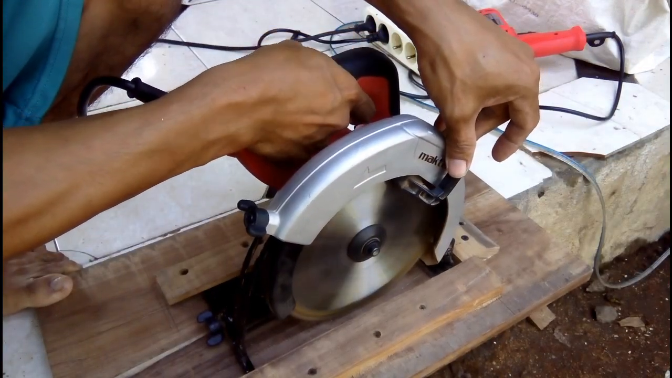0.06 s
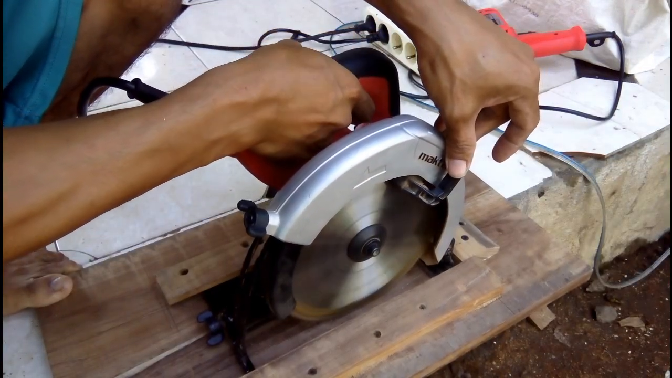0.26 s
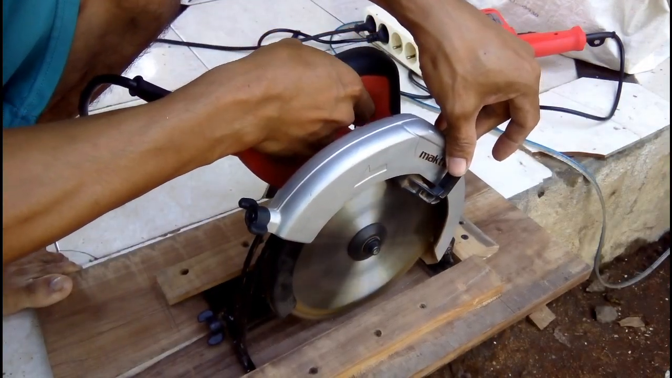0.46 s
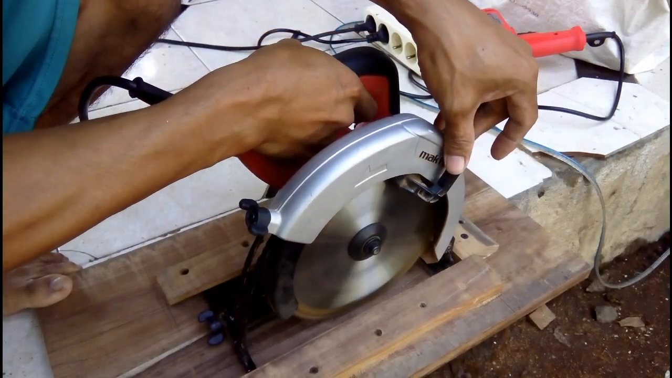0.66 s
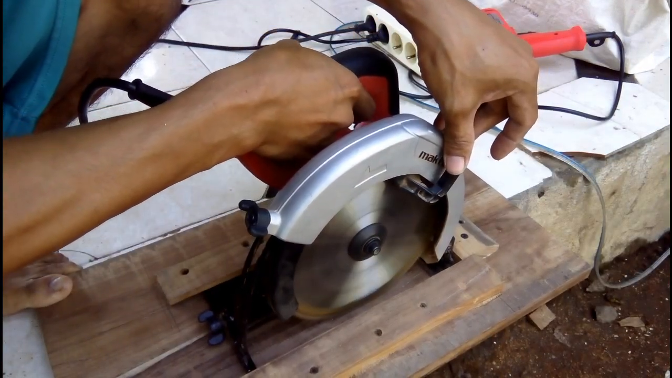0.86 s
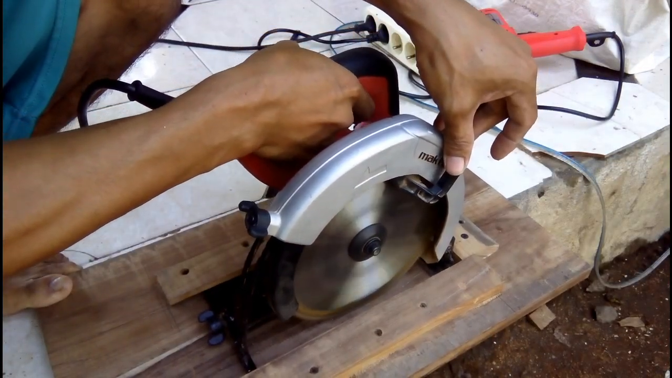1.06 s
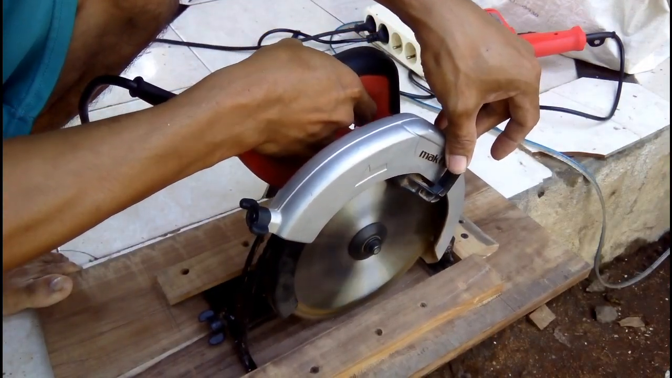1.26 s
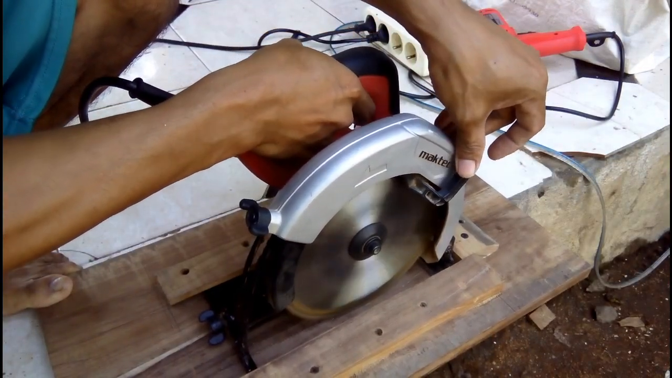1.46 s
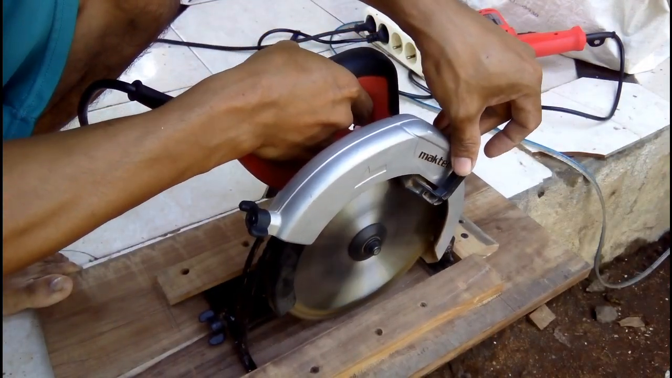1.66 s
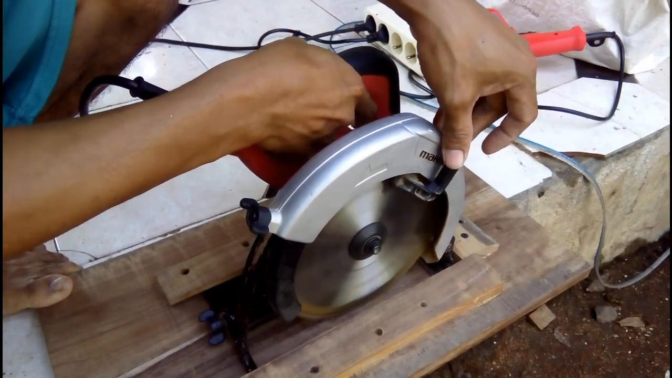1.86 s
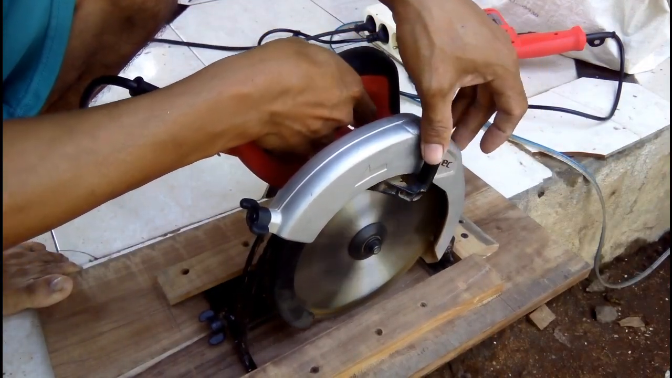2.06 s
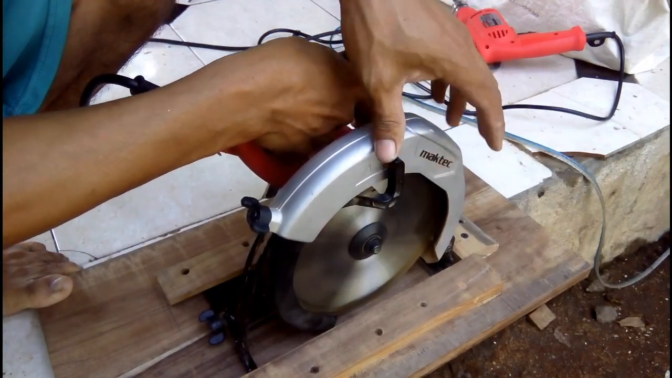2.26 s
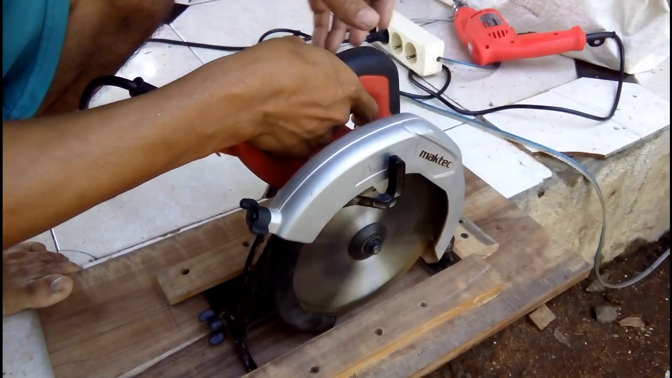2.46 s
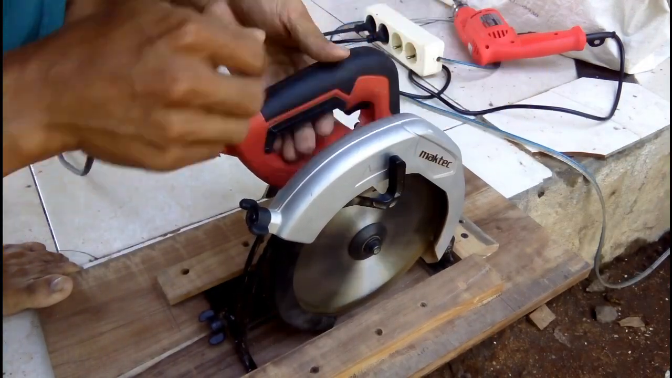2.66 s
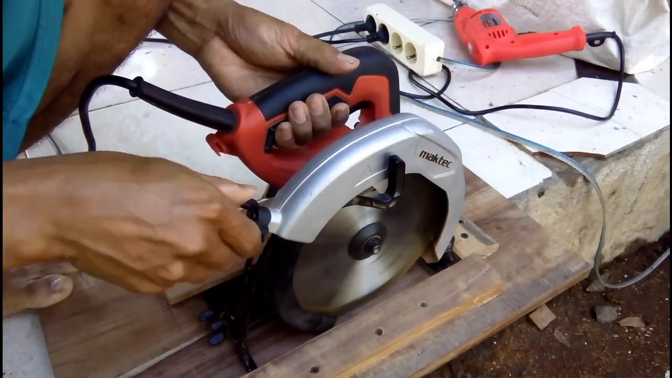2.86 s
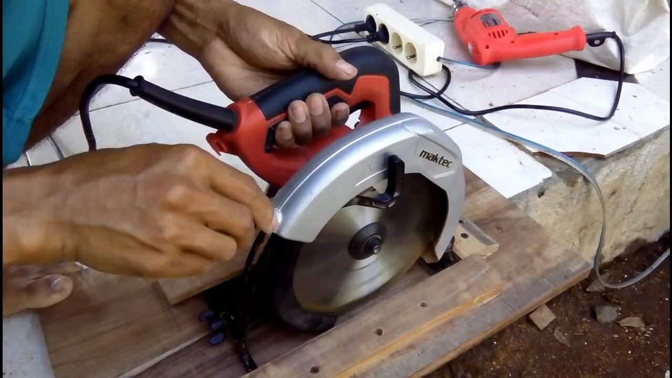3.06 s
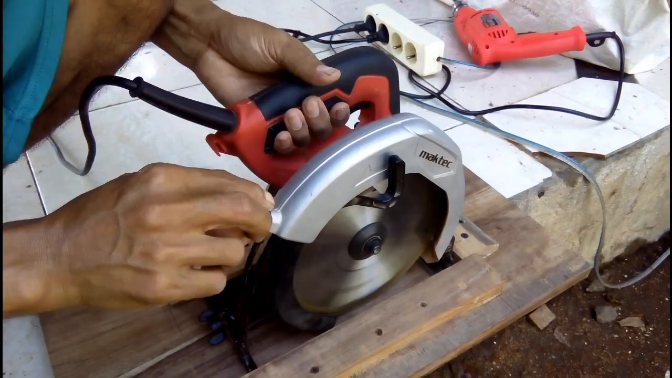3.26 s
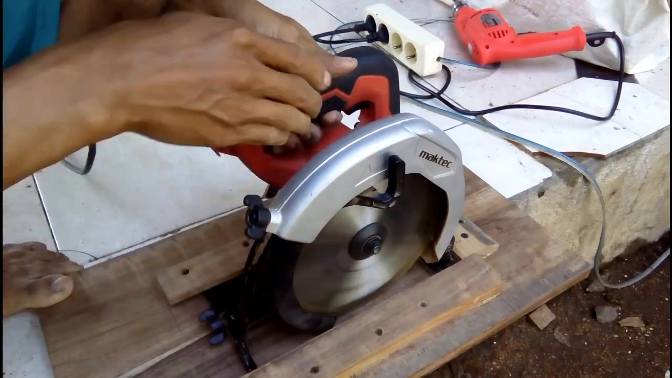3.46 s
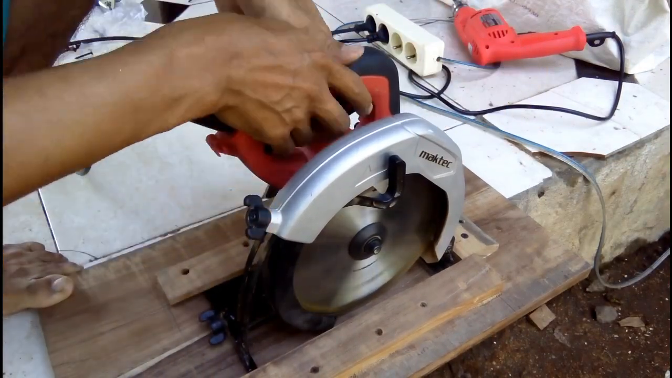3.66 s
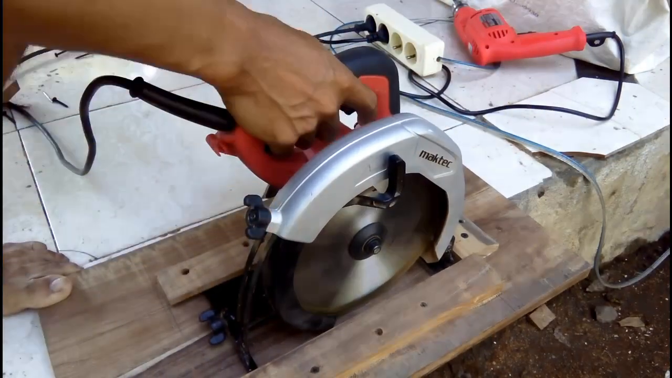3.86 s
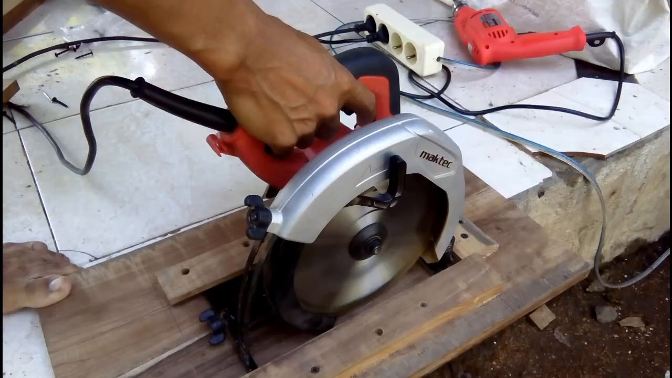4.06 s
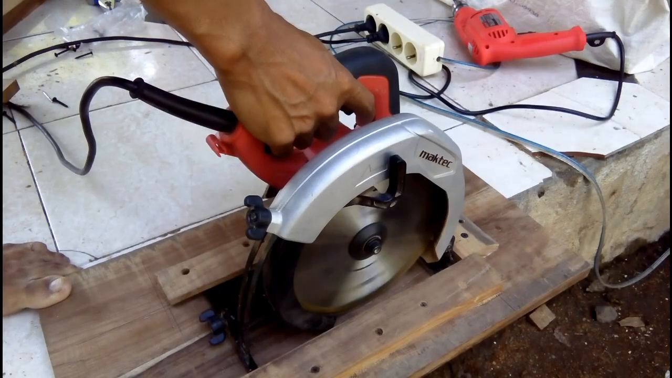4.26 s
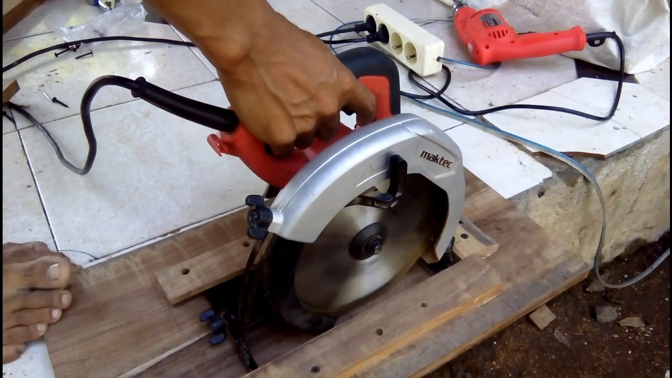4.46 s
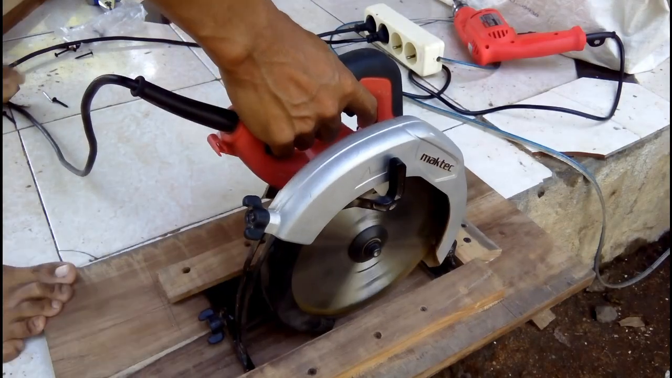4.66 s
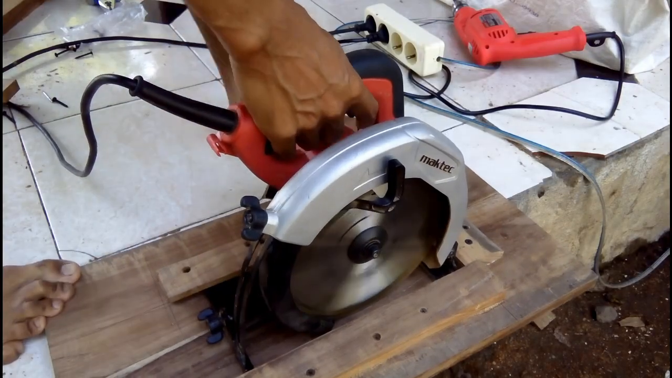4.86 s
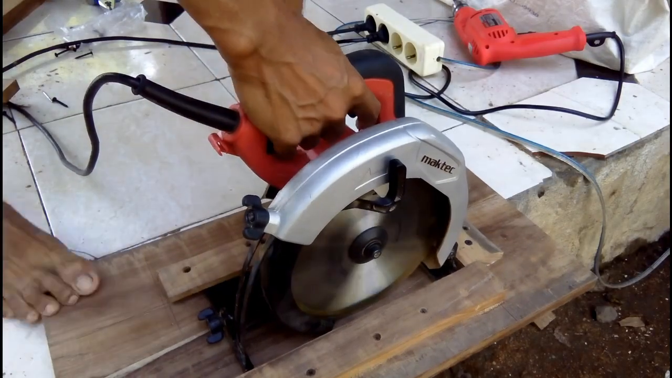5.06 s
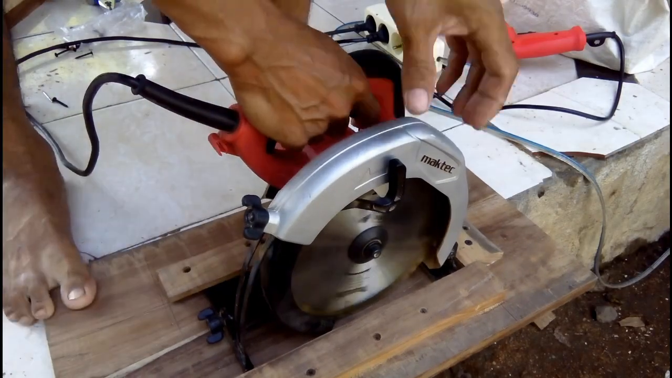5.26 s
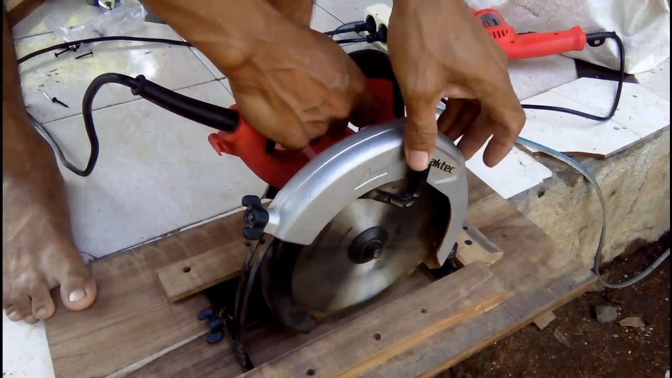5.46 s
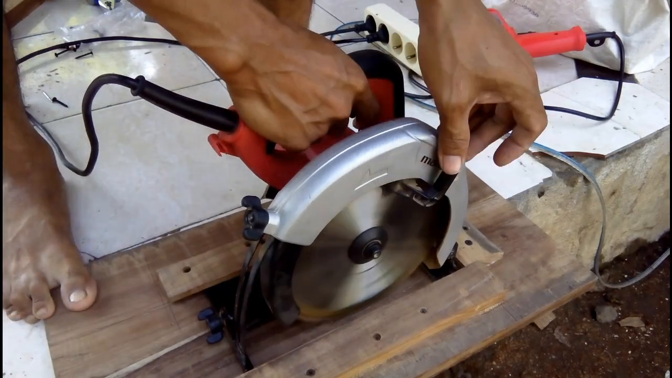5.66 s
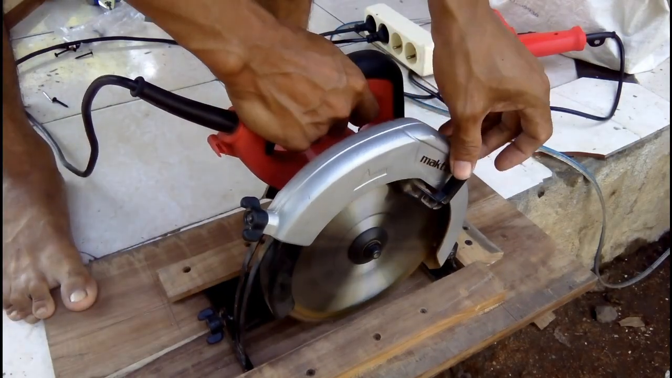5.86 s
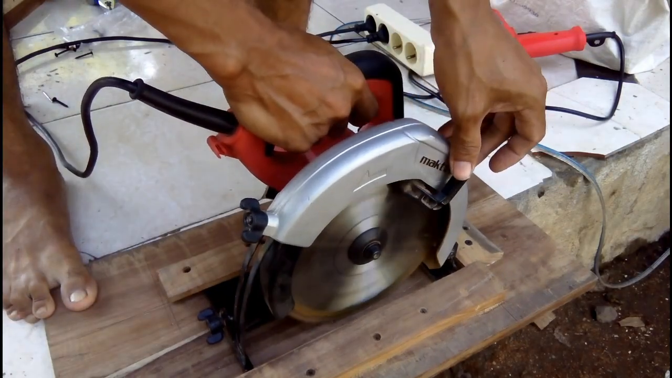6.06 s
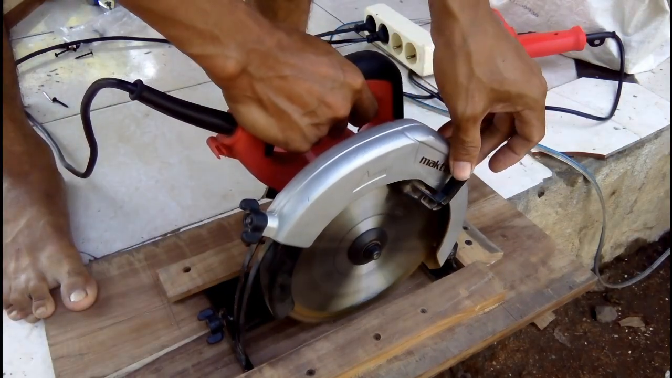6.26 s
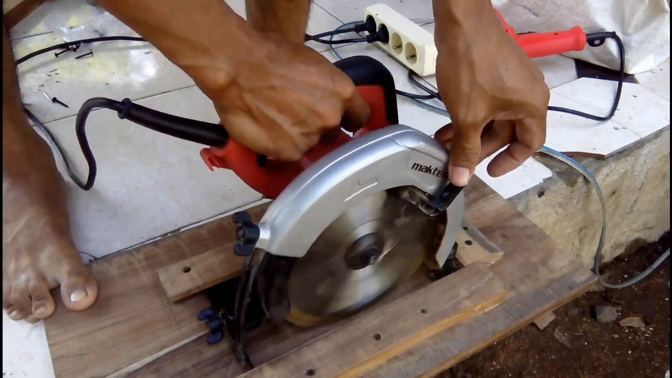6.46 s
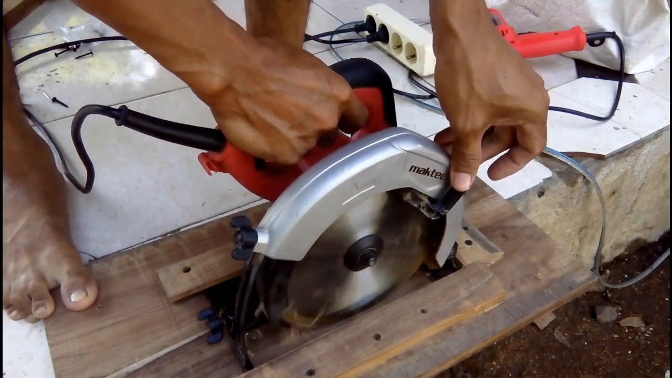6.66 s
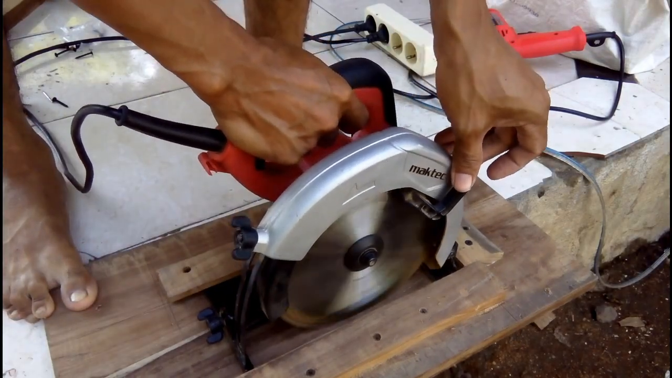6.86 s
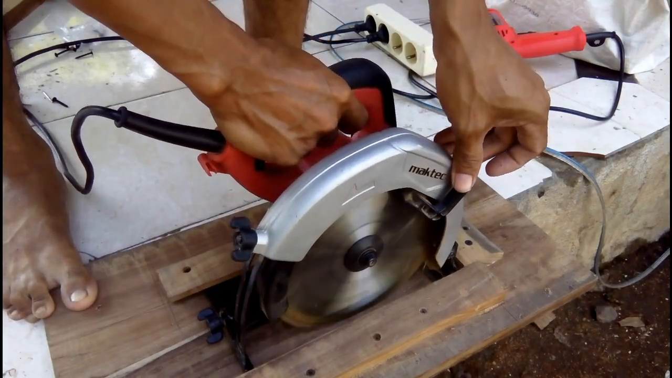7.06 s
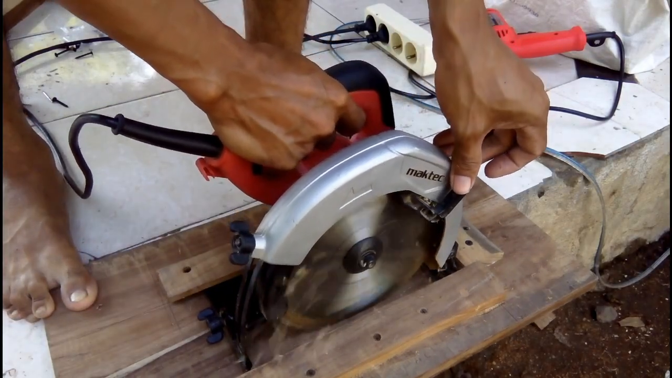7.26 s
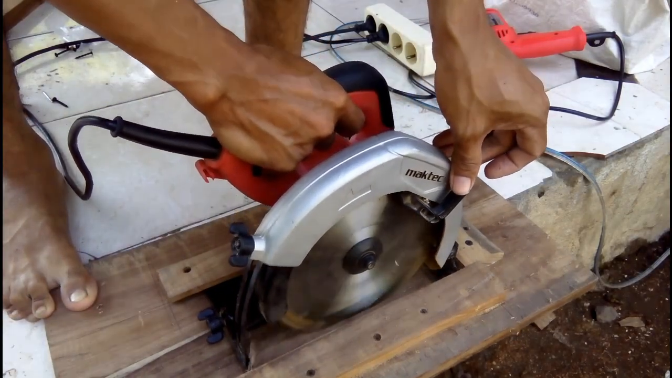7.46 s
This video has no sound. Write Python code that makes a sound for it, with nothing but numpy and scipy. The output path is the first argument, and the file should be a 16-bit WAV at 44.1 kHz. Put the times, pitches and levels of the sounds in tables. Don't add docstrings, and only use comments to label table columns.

```python
import sys
import numpy as np
from scipy import signal
from scipy.fft import rfft, irfft, next_fast_len
from scipy.io import wavfile
from scipy.ndimage import uniform_filter1d, map_coordinates

SR = 44100
rng = np.random.default_rng(int(sys.argv[2]) if len(sys.argv) > 2 else 0)


def undo_db(level):
    steps = np.asarray(level, float) / 20
    return 10 ** steps


def inscribe(sig):
    pcm = np.round(np.clip(np.atleast_2d(sig).T, -1, 1) * 32767)
    wavfile.write(sys.argv[1], SR, pcm.astype(np.int16))


N = 331632
TIME = np.arange(N) / SR
MAINS = 2 * np.pi * 100 * TIME
FAST_TURNS = 440


def unit(x):
    return x / np.sqrt(np.mean(x ** 2) + 1e-20)


def along(points, hz):
    f, v = np.transpose(points)
    return np.interp(np.log(hz + 1), np.log(f + 1), v)


def curves(rows):
    s, *cols = np.transpose(rows)
    return [np.interp(TIME, s, c) for c in cols]


def wobble(rate):
    coarse = np.arange(0, N + 16, 16)
    knots = rng.standard_normal(int(N * rate / SR) + 4)
    return np.interp(np.arange(N), coarse, map_coordinates(knots, [coarse * rate / SR]))


def filtered(x, response):
    m = next_fast_len(N + SR // 4)
    return irfft(rfft(x, m) * response(np.fft.rfftfreq(m, 1 / SR)), m)[..., :N]


def body(spectrum, modes):
    def response(f):
        peaks = sum(undo_db(2 * db) / (1 + (2 * (f - hz) / w) ** 2) for hz, w, db in modes)
        return undo_db(along(spectrum, f)) * np.sqrt(1 + peaks)
    return response


def resonant(modes):
    def response(f):
        return sum((-1) ** k * undo_db(db) * 1j * f * w / (c * c - f * f + 1j * f * w)
                   for k, (c, w, db) in enumerate(modes))
    return response


def patchy(depth_db, span):
    z = signal.stft(rng.standard_normal((2, N)), nperseg=span)[2]
    field = rng.standard_normal(z.shape[1:])
    field = uniform_filter1d(field, size=5, axis=0)
    field = uniform_filter1d(field, size=6144 // span, axis=1)
    return unit(signal.istft(z * undo_db(depth_db * unit(field)), nperseg=span)[1][:, :N])


# t/s, f/Hz (turns a second)
SHAFT = [(0, 410), (.62, 438), (.93, 372), (1.5, 435), (1.56, 425), (2.1, 328), (2.6, 276), (3.2, 215),
         (5.0, 66.5), (5.6, 13), (5.71, 6), (5.87, 140), (6.04, 126), (6.65, 440), (6.9, 466), (7.52, 468)]


def shaft_speed():
    return curves(SHAFT)[0]


def octaves_from_fast():
    return np.log2(shaft_speed() / FAST_TURNS)


# pulled t/s, released t/s, switch travel t/s
TRIGGER = [
    (-1, .63, .06),
    (.95, 1.53, .06),
    (5.718, 5.875, .012),
    (6.047, 9, .008),
]


def trigger():
    return sum(np.clip(np.minimum(TIME - on, off - TIME) / travel + .5, 0, 1) for on, off, travel in TRIGGER)


def motor_current():
    return trigger() * np.clip(1 - shaft_speed() / 480, 0, 1)


# t/s, level/dB, freedom of the blade to ring level/dB
HANDS = [(0, 1, -11), (.6, -0.5, -11), (.95, 2, -10.5), (1.3, 1, -8), (1.75, -0.5, -11.5), (1.88, 2, -9),
         (2.1, 1, -18), (2.7, 1, -19.5), (3.5, -0.5, -13.5), (4.5, 0, -6), (5.4, 2, -5), (5.78, 1.5, 4),
         (5.98, 5.5, -2.5), (6.25, 6.5, -3), (6.6, -0.5, -2), (6.7, 1, 1), (6.93, -2, 1), (7.52, -0.5, 3)]


def hands():
    return curves(HANDS)


def guard_bared():
    guard_s, swing_s = 6.656, 0.04
    return np.clip((TIME - guard_s) / swing_s + .5, 0, 1)


def ringing(shake, spectrum, modes):
    return unit(filtered(shake * patchy(depth_db=1.13, span=2 ** 9), body(spectrum, modes)))


# f/Hz, level/dB per Hz
FAN = [(35, -59), (60, -21), (135, -12.5), (275, -25), (422, -2), (476, -11.5), (701, -6.5), (1070, -13),
       (1680, -3.5), (2520, -2.5), (3780, -4), (6030, -0.5), (7700, -12.5), (10000, -41), (16900, -120)]
# f/Hz, width f/Hz, level/dB
GUARD = [(706, 80, 4), (1185, 90, 5), (1655, 30, 5), (2060, 120, 5), (2280, 250, 5), (2700, 60, 3),
         (3240, 120, 0), (3790, 320, 7), (4970, 120, 3), (5690, 60, 1), (6580, 120, 1)]


def fan_air(shake):
    level_db = -14 + 16.5 * octaves_from_fast() - 7 * guard_bared()
    return undo_db(level_db) * ringing(shake, FAN, GUARD)


def gear_level():
    coasting_db, per_octave_db, loaded_db = -20.5, 5, -5.5
    return undo_db(coasting_db + per_octave_db * octaves_from_fast() + loaded_db * trigger())


# f/Hz, level/dB per Hz
GEARS = [(180, -22), (300, -2.5), (399, -7), (901, -9.5), (1170, -6.5), (1880, -6), (2820, -9.5),
         (3270, -1), (3960, -15), (6280, -0.5), (7700, -24.5), (10000, -95), (16900, -120)]
# f/Hz, width f/Hz, level/dB
HOUSING = [(740, 114, 10.4), (1171, 24, 14.5), (1907, 780, 12.6), (3304, 12, 10.5), (3365, 66, 12.7),
           (4390, 150, 10.7), (5400, 46, 6.7), (6340, 520, 3.8)]


def gear_rattle(shake):
    level = gear_level() + undo_db(-27.5) * motor_current() + jolts()
    return level * ringing(shake, GEARS, HOUSING)


# f/Hz, level/dB per Hz
DRIVEN = [(35, -68), (60, -51), (492, -7), (603, -29), (696, -3.5), (945, -3), (1260, 1.5), (1480, -11),
          (1610, -4.5), (2570, -4.5), (3280, 2), (4110, -4), (7900, -7.5), (10300, -19.5), (17400, -120)]
# f/Hz, width f/Hz, level/dB
BLADE = [(715, 60, 6), (1170, 70, 9), (1300, 60, 12), (1630, 35, 11), (1760, 20, 10), (2170, 150, 3),
         (2700, 50, 4), (3280, 130, 12), (3860, 70, 3), (4440, 90, 5), (5665, 40, 9), (6570, 150, 7),
         (7604, 80, 8)]


def blade_ring(shake):
    _, free_db = hands()
    drive = undo_db(-14.5 + 9 * octaves_from_fast()) + undo_db(-35.5) * motor_current()
    return undo_db(free_db) * drive * ringing(shake, DRIVEN, BLADE)


# f/Hz, level/dB per Hz
FIZZ = [(4470, -12), (7600, 0.5), (8050, -10), (9640, -7.5), (13600, -19), (14600, -16.5), (15200, -28)]


def tips_and_arcs():
    tips = undo_db(-29.5 + 14.5 * octaves_from_fast() + 8.5 * guard_bared())
    arcs = undo_db(-22.5) * motor_current() * (shaft_speed() / FAST_TURNS) ** 2.4
    sparks = patchy(depth_db=4.5, span=2 ** 11) * undo_db(.9 * wobble(40) + .7 * wobble(9))
    return (tips + arcs) * unit(filtered(sparks, body(FIZZ, [])))


def saw():
    shaft_hz, power = shaft_speed(), trigger()
    shake = undo_db(0.99 * wobble(260) + 0.69 * wobble(30) + 0.37 * power * np.cos(MAINS))
    sound = fan_air(shake) + gear_rattle(shake) + blade_ring(shake)
    sound = sound + gear_level() * undo_db(-7.5 - 1.3 * octaves_from_fast()) * whine(shaft_hz, power)
    dull = filtered(sound, lambda f: 1 / (1 + (f / 3800) ** 4))
    slow = (1 - power) * np.clip(1 - shaft_hz / 70, 0, .9)
    sound = sound + slow * (dull - sound)
    level_db, _ = hands()
    return undo_db(level_db) * (sound + tips_and_arcs()) + stall(shaft_hz, power)


# start t/s, end t/s, multiple of shaft speed, level/dB
CROSSINGS = [(0, 0.268, 1, -28), (0.326, 0.66, 1, -25), (1, 1.495, 1, -36), (1.849, 2.109, 1, -31),
             (2.551, 2.9, 7, -31), (2.9, 3.121, 23.6, -25), (4.073, 4.3, 14, -37), (4.6, 4.8, 21, -36),
             (4.738, 4.864, 14, -34), (5.07, 5.155, 21, -34), (5.402, 5.471, 42, -42)]
# start t/s, end t/s, start f/Hz, end f/Hz, level/dB
SONGS = [(0.134, 0.246, 1680, 1666, -25), (0.354, 0.513, 1652, 1664, -13), (1.079, 1.297, 1650, 1655, -15),
         (1.8, 1.91, 1165, 1170, -21), (1.816, 1.93, 1632, 1620, -26), (2.398, 2.46, 1666, 1630, -21),
         (2.399, 2.85, 5410, 5380, -31.5), (2.794, 3.05, 3400, 3360, -27), (3.347, 3.903, 5420, 5340, -34),
         (3.744, 3.965, 3300, 3280, -27), (6.18, 6.42, 1143, 1167, -16.5), (6.275, 6.73, 1719, 1768, -17),
         (6.29, 6.66, 1622, 1635, -19.5), (6.335, 6.6, 2690, 2740, -20), (6.648, 6.904, 1257, 1304, -17),
         (6.855, 7.055, 1653, 1610, -18), (7.153, 7.267, 1650, 1617, -14.5),
         (7.145, 7.324, 1300, 1308, -11), (6.75, 7.523, 5700, 5610, -19.5)]


def songs():
    out, flutter, drift = np.zeros(N), undo_db(2.8 * wobble(45)), 0.84 * wobble(50)
    shaft_hz = shaft_speed()

    def span(s0, s1):
        return slice(round(s0 * SR), round(s1 * SR))

    notes = [(span(s0, s1), k * shaft_hz[span(s0, s1)], db) for s0, s1, k, db in CROSSINGS]
    for s0, s1, hz, end_hz, db in SONGS:
        when = span(s0, s1)
        notes.append((when, np.linspace(hz, end_hz, len(out[when])), db))
    for when, hz, db in notes:
        swell = np.sqrt(np.abs(np.sin(np.linspace(0, np.pi, len(hz)))))
        phase = 2 * np.pi * np.cumsum(hz) / SR + drift[when]
        out[when] += undo_db(db - 3.5) * swell * np.sin(phase)
    return out * flutter


# t/s, firings f/Hz, exhaust level/dB
BIKE = [(0, 24.9, -45), (1, 28.36, -37), (1.75, 30.9, -39), (2, 31.76, -35), (3, 33.4, -32),
        (3.95, 36.23, -26.5), (4.3, 36.1, -19.5), (4.55, 31.44, -26), (4.72, 26.58, -24), (5.1, 26.4, -35),
        (5.7, 26.03, -33), (6.2, 25.55, -33.5), (7.52, 25.32, -48.5)]
# f/Hz, width f/Hz, level/dB
NEARING = [(113, 57, 0), (157.5, 29.2, 5.5), (305, 76, -9)]
# f/Hz, width f/Hz, level/dB
LEAVING = [(77.4, 54, 5.8), (128.5, 46, 11.5), (319, 78, 1.6)]


def motorcycle():
    firing_hz, level_db = curves(BIKE)
    count = np.cumsum(firing_hz * (1 + .04 * wobble(25))) / SR
    at = np.flatnonzero(np.diff(np.floor(count)))
    puffs = np.zeros(N)
    puffs[at] = undo_db(1.9 * rng.standard_normal(N // 500)[:len(at)])
    puffs = unit(puffs) + 0.6 * rng.standard_normal(N)

    def heard(modes):
        return unit(filtered(puffs, lambda f: resonant(modes)(f) / (1 + 1j * f / 600)))

    pass_s = 4.7
    gone = 1 / (1 + np.exp(-(TIME - pass_s) / 0.074))
    gusty_db = 2.15 * wobble(12)
    return undo_db(level_db - 3.5 + gusty_db) * ((1 - gone) * heard(NEARING) + gone * heard(LEAVING))


# f/Hz, level/dB per Hz
YARD = [(15, -45), (25, -4), (121, -3), (218, -31), (332, 9.5), (889, 7), (1820, -18), (6220, -43),
        (9000, -66), (11700, -83), (19800, -120)]


def yard():
    return undo_db(-48) * unit(filtered(rng.standard_normal((2, N)), lambda f: undo_db(along(YARD, f))))


# multiple, level/dB
ORDER = [(7, -21), (13, -30), (14, -23), (20, -29), (21, -24), (24, -24), (28, -26), (32.5, -29),
         (39.6, -20), (48, -27), (56, -29)]
# f/Hz, width f/Hz, level/dB
MESH = [(665, 110, -1), (1010, 90, -3), (1170, 100, 3), (1900, 330, 1), (2750, 600, -5), (3350, 250, 1),
        (4300, 600, -7), (5500, 500, -1), (6300, 350, -3)]


def whine(shaft_hz, power):
    turn = 2 * np.pi * np.cumsum(shaft_hz) / SR
    start = rng.uniform(0, 2 * np.pi, (len(ORDER), 2, 1))
    lines = sum(undo_db(db + 4 * wobble(35)) * np.sin(k * turn + p + .8 * wobble(90))
                for (k, db), p in zip(ORDER, start))
    grind = sum(np.array([wobble(340), wobble(340)]) * wave(7 * turn) for wave in (np.sin, np.cos))
    coasting = (TIME < 5.71) * (1 - power)
    source = coasting * (lines + undo_db(-12) * grind * shaft_hz / FAST_TURNS)
    return unit(filtered(source, lambda f: resonant(MESH)(f) ** 2 / (1 + (f / 6500) ** 8)))


# t/s, peak level/dB, modes f/Hz, t60 t/s
SNAPS = [
    (2.387, -16.5, [364, 580, 870], 0.027),
    (4.066, -16, [1970, 1900, 3150], 0.017),
]


def lever():
    out = np.zeros(N)
    for s, db, modes, t60 in SNAPS:
        since = np.clip(TIME - s, 0, None)
        out += sum(undo_db(db - 60 * since / t60) * np.sin(2 * np.pi * hz * since) for hz in modes)
    return out


# t/s, peak level/dB, brightness level/dB, ring share 0-1
KNOCKS = [
    (5.712, -15, -8, 1),
    (5.728, 0.5, 4, 0.94),
    (5.758, -7.5, 5, 1),
    (5.781, -5.5, 6, 1),
    (5.804, -1.5, 8.5, 0.34),
    (5.848, -5.5, 8, 0.3),
    (5.887, -9, 6, 0.2),
    (6.044, -7, 9, 0.92),
    (6.067, -13, 7, 0.6),
    (6.656, -5, 9, 0.9),
]


def jolts():
    settle_s = 0.024
    return sum(undo_db(db - 25) * (TIME >= s) * np.exp(-np.abs(TIME - s) / settle_s) for s, db, *_ in KNOCKS)


# f/Hz, level/dB, t60 t/s
CASE = [(295, -6, 0.023), (514, -8, 0.023), (830, -2.5, 0.043), (964, 0, 0.047), (1170, 6.5, 0.076),
        (2120, -19, 0.018), (3310, -18, 0.02), (4460, -9.5, 0.026)]


def knocks():
    out, t = np.zeros(N + SR), np.arange(SR // 8) / SR
    chances = rng.standard_normal((len(KNOCKS), len(CASE)))
    for (s, db, bright_db, share), chance in zip(KNOCKS, chances):
        ring = 0
        for (hz, g, t60), c in zip(CASE, chance):
            tilt_db = np.clip(bright_db, -6, 9) * np.log2(hz / 1150)
            decay_db = 60 * t / (share * t60)
            ring = ring + undo_db(g + 2 * c + tilt_db - decay_db) * np.sin(2 * np.pi * hz * t + 3 * c)
        out[round(s * SR):][:len(t)] += undo_db(db - 10) * (1 - np.exp(-t / 0.00094)) * ring
    return out[:N]


# f/Hz, width f/Hz, level/dB
SHUDDER = [(190, 92, -30), (303, 100, -29)]
# f/Hz, level/dB
HUM = [(100, -33), (200, -26), (300, -27), (400, -34), (500, -32)]


def stall(shaft_hz, power):
    strain = power * np.clip(1 - shaft_hz / 260, 0, 1)
    shudder = sum(undo_db(db) * unit(filtered(rng.standard_normal(N), resonant([(hz, w, 0)])))
                  for hz, w, db in SHUDDER)
    hum = sum(undo_db(db) * np.sin(hz / 100 * MAINS) for hz, db in HUM)
    return strain ** 2 * shudder + strain * undo_db(-2.5 + 3 * wobble(70)) * hum


# f/Hz, likeness 0-1
ALIKE = [(60, 0.89), (250, 0.96), (700, 1), (1400, 0.53), (2800, 0.41), (5600, 0.19), (10000, 0.051),
         (15000, .1)]
# f/Hz, level/dB
TILT = [(60, 4), (99, 1.5), (160, 4), (270, 3), (440, 5.5), (730, 4), (1210, 5.5), (1990, 8.5), (3290, 9),
        (5430, 2), (8950, -2.5), (14800, 24.5)]
# f/Hz, phase/radians
LEAD = [(0, -2), (1460, 1), (2240, 0.93), (3360, 1.87), (4480, 0.5), (5430, 8.5), (6030, 10), (6720, 10.5),
        (8010, 18), (8960, -2.5), (9470, 23.5), (11200, 4.5), (14300, 27), (14900, 23)]


def scene():
    single = knocks() + lever() + songs() + motorcycle()
    pair = saw() + yard() + [single, np.roll(single, 900)]

    def split(f):
        turn = np.arccos(np.clip(along(ALIKE, f), -1, 1)) / 2
        return np.array([np.cos(turn), np.sin(turn)])

    def ports(f):
        lean = undo_db(along(TILT, f) / 2) * np.exp(.5j * along(LEAD, f))
        return np.array([lean, 1 / lean])

    mid, side = filtered(pair, split)
    return filtered(np.array([mid + side, mid - side]), ports)


def top_cut(x):
    return signal.sosfilt(signal.butter(12, 15370, fs=SR, output="sos"), x)


def record(dry):
    mix = np.clip(dry, -1, 1)
    return top_cut(mix)


dry = scene()
out = record(dry)
inscribe(out)
```